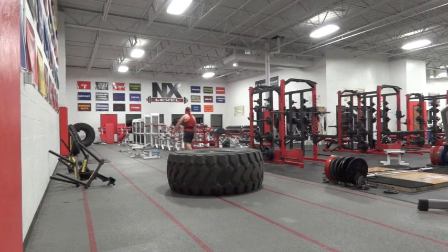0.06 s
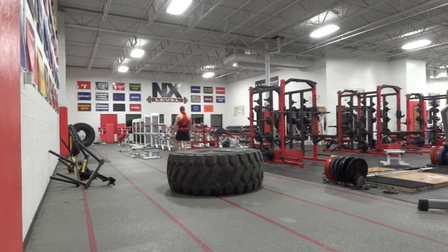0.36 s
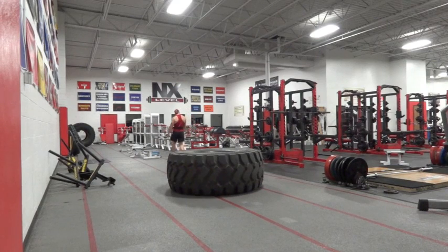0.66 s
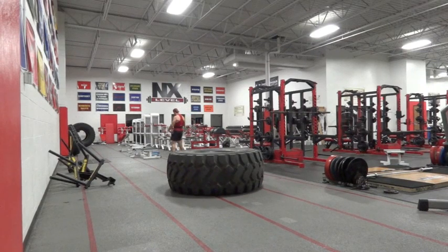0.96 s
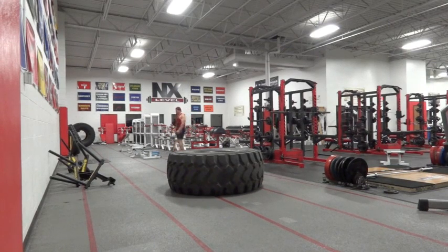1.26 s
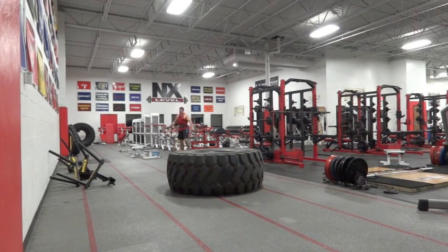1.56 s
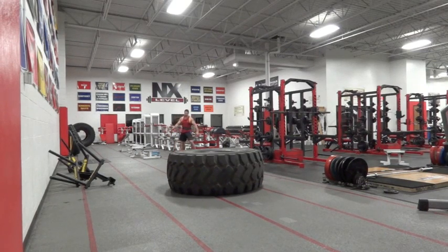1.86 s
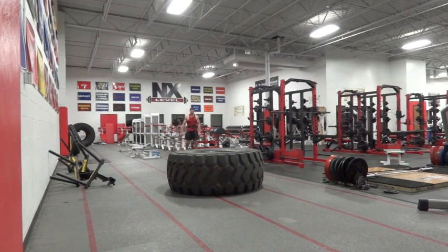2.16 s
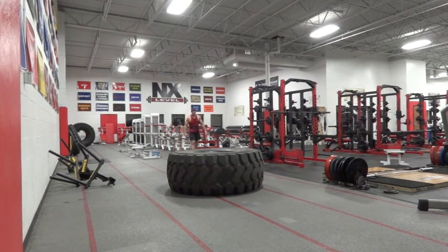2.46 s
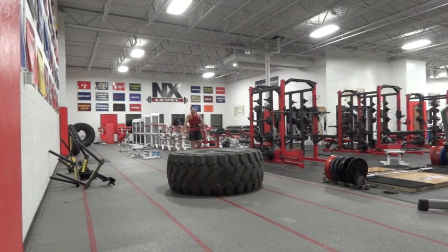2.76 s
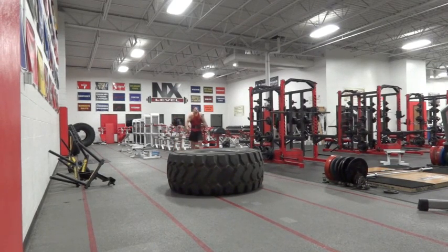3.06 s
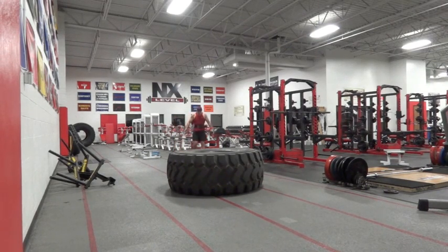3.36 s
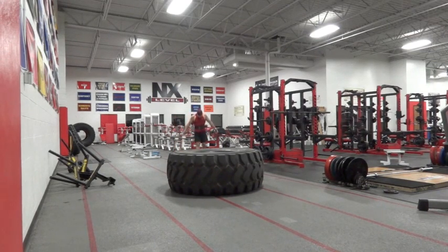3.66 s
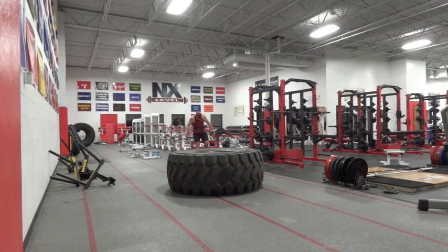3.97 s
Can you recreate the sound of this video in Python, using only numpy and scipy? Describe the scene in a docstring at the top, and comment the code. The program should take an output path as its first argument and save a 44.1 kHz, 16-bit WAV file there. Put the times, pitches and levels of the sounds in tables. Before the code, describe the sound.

A ventilation fan drones with an uneven flutter over a low duct rumble in a large gym. Air rushes throughout with thin whistles and light, gritty rubbing, then the hum drops just before the end.

```python
"""A fan drone near 216 Hz, fluttering unevenly over a low duct rumble: ventilation in a large gym.
Air rushes through narrow resonances, with thin whistles and fine grit in the treble.
Something rubs lightly on every turn of the shaft. A faint ring dies away at the start.
The drone falls away just before the end, and the rush eases with it."""
import sys
import numpy as np
from scipy import signal
from scipy.fft import rfft, irfft
from scipy.io import wavfile
from scipy.ndimage import uniform_filter1d

SR = 44100
rng = np.random.default_rng(int(sys.argv[2]) if len(sys.argv) > 2 else 0)


def pcm_store(signal):
    """Save signal as 16-bit PCM."""
    levels = np.round(np.clip(np.atleast_2d(signal), -1, 1) * 32767)
    wavfile.write(sys.argv[1], SR, levels.astype(np.int16).T)


N = 176400
TIME_S = np.arange(N) / SR
BIN_HZ = np.maximum(np.arange(N // 2 + 1) * SR / N, 1)
SHAFT_HZ = 13.5

# Envelope of upper rush, whistles and grit: t/s, level/dB
RUSH_ENVELOPE = [(0, -0.5), (2, -0.28), (3.75, 0), (4, -2.5)]


def undb(db):
    """Decibels to gain."""
    return 10 ** (np.asarray(db) / 20)


def level(x, rms_db):
    """Scale x to an rms level."""
    return x * undb(rms_db) / np.sqrt(np.mean(x ** 2))


def colour(points):
    """Gain per bin from rows of f/Hz, level/dB."""
    hz, db = np.array(points, float).T
    return undb(np.interp(np.log(BIN_HZ), np.log(hz), db))


def curve(points):
    """Gain per sample from rows of t/s, level/dB."""
    return undb(np.interp(TIME_S, *np.array(points, float).T))


def decay(t60_s):
    """Exponential envelope, 60 dB down at t60_s."""
    return np.exp(-np.log(1000) * TIME_S / t60_s)


def resonance(hz, width_hz):
    """Gain per bin of one peak; full width at half amplitude."""
    return 1 / (1 + (2 * (BIN_HZ - hz) / width_hz) ** 2)


def noise(gain):
    """Unit-rms noise shaped by a gain per bin."""
    phase = 2 * np.pi * rng.random(len(gain))
    return level(irfft(gain * np.exp(1j * phase), N), rms_db=0)


def wander(rate_hz):
    """Smooth unit-rms random motion, up to about rate_hz."""
    return noise(np.exp(-(BIN_HZ / rate_hz) ** 2))


def hall_noise(gain):
    """Stereo noise: a common part plus a weaker diffuse part from the hall."""
    # Side relative to mid: f/Hz, level/dB
    stereo_width = [(60, -23.5), (200, -21), (380, -12), (1290, -13), (2380, -14), (5500, -15),
                    (7000, -11.5), (10000, -25.5), (15000, -48)]
    side_gain = gain * colour(stereo_width)
    side = noise(side_gain) * np.sqrt(np.sum(side_gain ** 2) / np.sum(gain ** 2))
    return noise(gain) + np.array([[1], [-1]]) * side


def fan():
    """A wavering blade tone beats with narrow-band turbulence; both throb once a turn."""
    # Turbulence spectrum: f/Hz, relative level/dB
    turbulence = [(160, -36.5), (174, -20.5), (184, -10.5), (192, -19.5), (204, -14.5), (214, -5),
                  (228, -1), (236, -2), (245, -4.5), (256, -12), (275, -18), (320, -21.5), (400, -31),
                  (520, -67.5)]
    # Drone envelope: t/s, level/dB
    envelope = [(0, -3), (.35, 1.5), (.56, -2.5), (.63, -1), (1.02, 1.2), (1.22, -0.5), (1.66, 0), (2, 1.6),
                (2.38, -0.5), (2.6, 2), (2.84, -1.5), (2.9, -4), (3.02, 0.5), (3.61, 0), (3.84, -0.5),
                (3.865, -11.5), (4, -8)]
    blade_hz, drift_hz, flutter_db = 216.5, 1.624, 2.0
    phase = 2 * np.pi * np.cumsum(blade_hz + drift_hz * wander(rate_hz=4.42)) / SR
    tone = np.sin(phase) * undb(flutter_db * wander(rate_hz=2.9))
    drone = level(tone, rms_db=-24) + undb(-23) * hall_noise(colour(turbulence))
    power = uniform_filter1d(np.mean(drone ** 2, axis=0), size=SR // 6)
    steady = drone / np.sqrt(power / power.mean())  # evens out slow random swells
    throb = 1 + .24 * np.cos(2 * np.pi * SHAFT_HZ * TIME_S)
    return steady * throb * curve(envelope)


def duct_rumble():
    """Low rumble of air moving in the duct."""
    # Rumble spectrum: f/Hz, relative level/dB
    spectrum = [(15, -28), (30, -29), (46, -14), (60, -10), (70, 0), (82, -2.5), (95, -7), (110, -6.5),
                (128, -6.5), (150, -13), (250, -22), (500, -64)]
    return undb(-36) * hall_noise(colour(spectrum))


def air_rush():
    """Flow noise combed by fixed reflections, plus air-path resonances; the level flickers slightly."""
    # Rush spectrum: f/Hz, relative level/dB
    spectrum = [(200, -15), (400, -9.5), (490, -7.5), (600, -4), (770, -12.5), (880, -7.5), (1060, -9),
                (1200, -4), (1370, -8), (1550, -4.5), (1850, -8.5), (2030, -3.5), (2250, -5.5), (2500, 0),
                (3100, -2.5), (3720, 1), (4150, -4.5), (4700, -9.5), (5600, -13.5), (6600, -10.5),
                (7000, -15.5), (8000, -11.5), (9500, -22), (12500, -33), (15500, -53)]
    # Air-path resonances: f/Hz, nominal width/Hz, relative level/dB
    modes = [(885, 78, -7), (2183, 8.3, 2), (2374, 44, 2), (2768, 24, 0.5), (3340, 27, -9), (3450, 12, -1),
             (3680, 170, -11.5), (4396, 80, -8.5), (5024, 120, -5), (5490, 170, -7.5), (5840, 64, -5.5),
             (6530, 42, -8.5), (7540, 140, -12.5), (8020, 69, -18)]
    # Envelope below the crossover: t/s, level/dB
    lower_envelope = [(0, 0.5), (.6, .5), (1.4, 0.1), (2.5, 1), (3.5, -.5), (3.8, -1.5), (4, -3.5)]
    echo_share, crossover_hz, flicker_db = .58, 1520, .5
    echoes = rng.standard_normal(N) * decay(t60_s=.22)
    comb = level(abs(rfft(echoes)), rms_db=0)
    rush_gain = colour(spectrum) * np.sqrt(1 - echo_share + echo_share * comb ** 2)
    mode_power = sum((undb(db) * resonance(hz, 1.08 * width)) ** 2 for hz, width, db in modes)
    flow = undb(-28) * hall_noise(rush_gain) + undb(-34.5) * hall_noise(np.sqrt(mode_power))
    lower = irfft(rfft(flow) / (1 + (BIN_HZ / crossover_hz) ** 8), N)
    flow = lower * curve(lower_envelope) + (flow - lower) * curve(RUSH_ENVELOPE)
    return flow * undb(flicker_db * wander(rate_hz=45))


def whistles():
    """Thin unsteady tones in the rush: very narrow noise bands."""
    # Whistle peaks: f/Hz, relative level/dB
    peaks = [(856, -51), (2046, -50), (2175, -49), (2390, -44), (2767, -48), (3266, -46), (3432, -48),
             (3560, -46), (4954, -51), (6303, -56), (7107, -58), (7467, -56), (8010, -57)]
    power = sum((undb(db) * resonance(hz, width_hz=12)) ** 2 for hz, db in peaks)
    gain = undb(-2) * np.sqrt(sum(undb(db) ** 2 for _, db in peaks))
    return gain * hall_noise(np.sqrt(power)) * curve(RUSH_ENVELOPE)


def shaft_rub():
    """High resonances brushed at the same three angles on every turn."""
    # Contacts: angle/turns, relative level/dB
    rubs = [(.22, 0), (.44, -3.5), (.93, 0)]
    # Resonances of the rubbed part: f/Hz, width/Hz, relative level/dB
    modes = [(3730, 200, -4), (5030, 180, -7), (5540, 260, 0), (6500, 3500, -16)]
    sigma_turns = .05
    contact = np.zeros(N)
    for angle_turns, db in rubs:
        offset_turns = (SHAFT_HZ * TIME_S - angle_turns + .5) % 1 - .5
        contact += undb(db) * np.exp(-.5 * (offset_turns / sigma_turns) ** 2)
    body = sum(undb(db) * resonance(hz, width) for hz, width, db in modes)
    return level(hall_noise(body) * contact, rms_db=-39.5)


def grit():
    """Dense tiny ticks from the turning parts roughen the treble."""
    # Tick spectrum: f/Hz, relative level/dB
    spectrum = [(1500, -15), (3500, 0), (6000, -1), (8500, -7), (12000, -21), (15000, -25)]
    ticks_per_s, scatter_db, tau_s = 330, 3, .0018
    ticks = (rng.random(N) < ticks_per_s / SR) * rng.choice([-1, 1], N)
    ticks = ticks * undb(scatter_db * rng.standard_normal(N))
    burst = rng.standard_normal(N) * np.exp(-TIME_S / tau_s)
    crackle = irfft(rfft(ticks) * rfft(burst) * colour(spectrum), N)
    return level(crackle, rms_db=-45.5) * curve(RUSH_ENVELOPE)


def fading_ring():
    """A faint ring dies away in the hall at the start."""
    return undb(-39) * hall_noise(resonance(hz=945, width_hz=180)) * decay(t60_s=1.6)


def scene():
    """All sources, a touch stronger on the left."""
    balance_db = .1
    mix = fan() + duct_rumble() + air_rush() + whistles() + shaft_rub() + grit() + fading_ring()
    return mix * undb(np.array([[balance_db], [-balance_db]]) / 2)


def record(dry):
    """Steep elliptic low-pass."""
    cutoff_hz = 15600
    return signal.sosfilt(signal.ellip(10, .1, 80, cutoff_hz, fs=SR, output="sos"), dry)


dry = scene()
out = record(dry)
pcm_store(out)
```